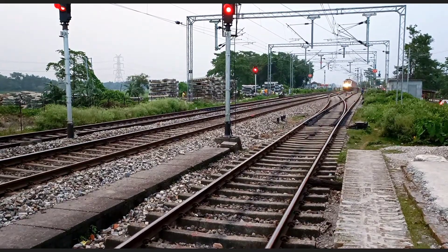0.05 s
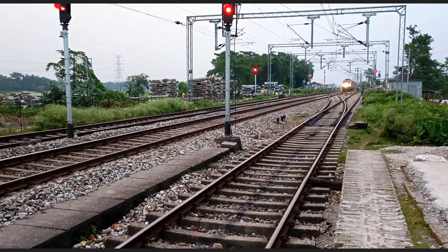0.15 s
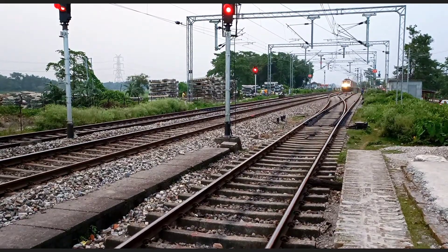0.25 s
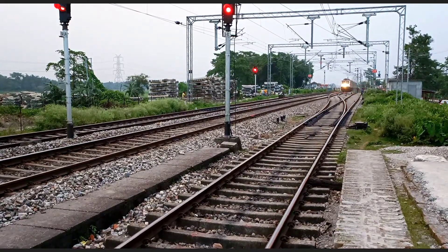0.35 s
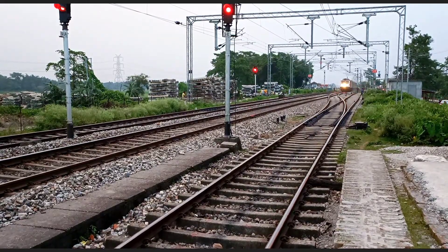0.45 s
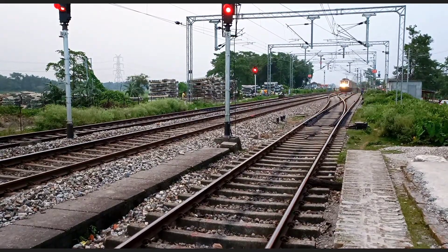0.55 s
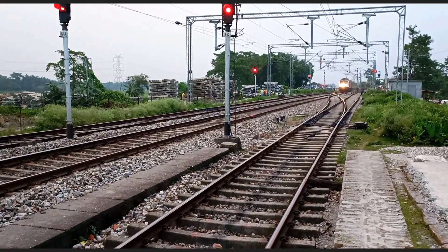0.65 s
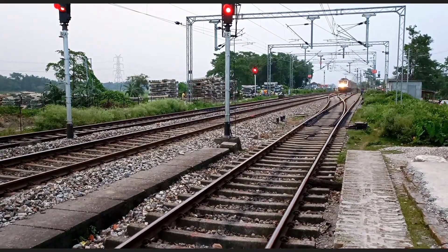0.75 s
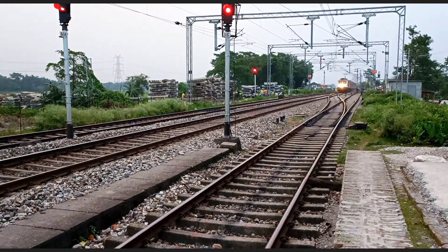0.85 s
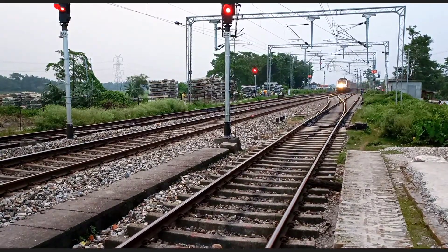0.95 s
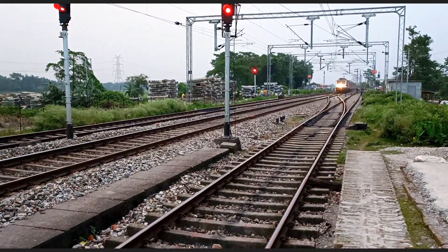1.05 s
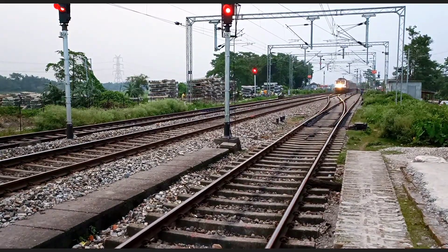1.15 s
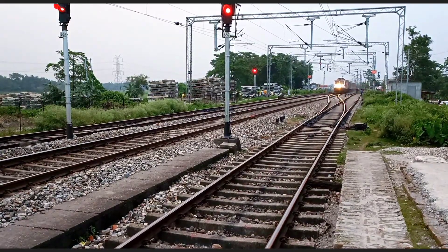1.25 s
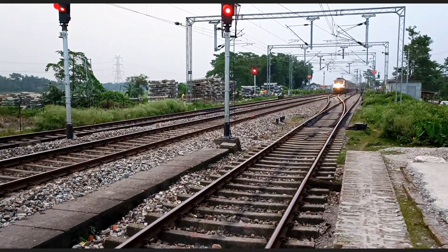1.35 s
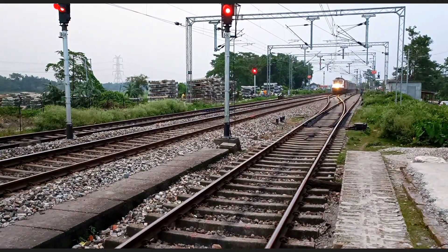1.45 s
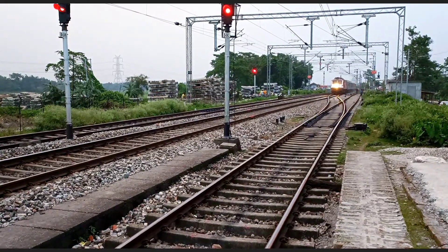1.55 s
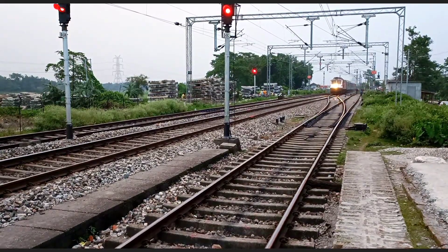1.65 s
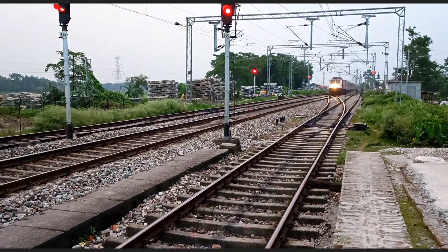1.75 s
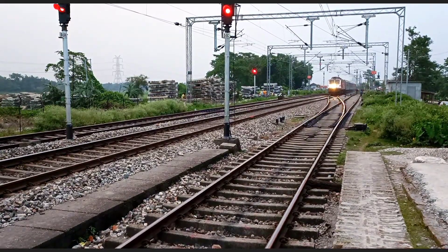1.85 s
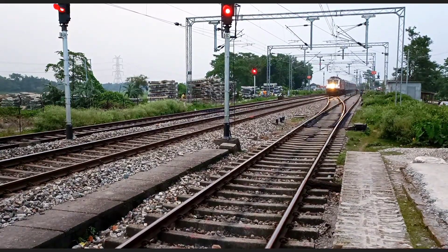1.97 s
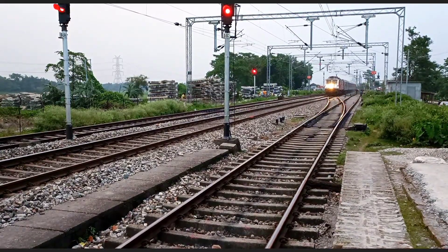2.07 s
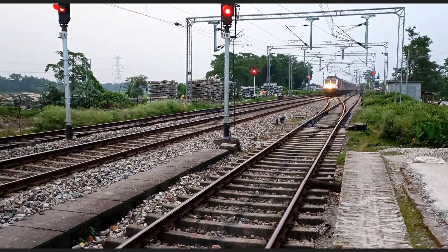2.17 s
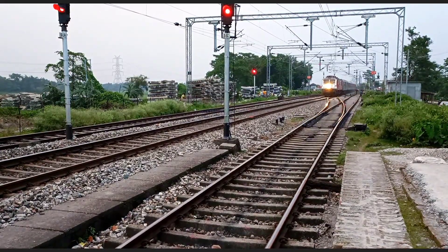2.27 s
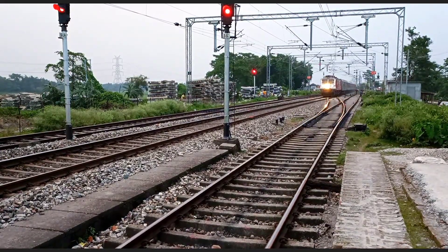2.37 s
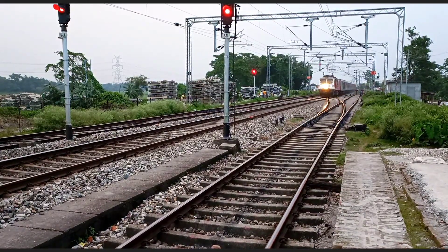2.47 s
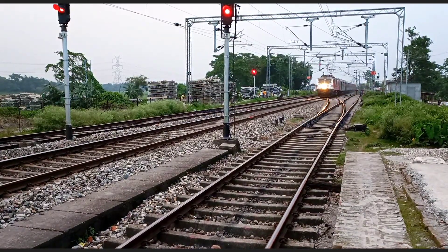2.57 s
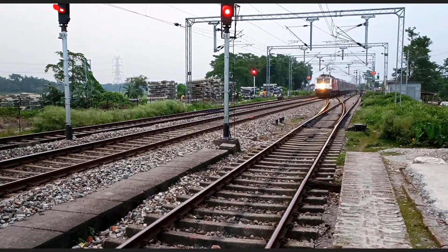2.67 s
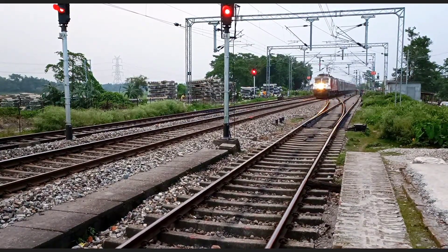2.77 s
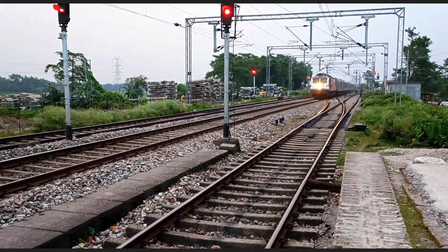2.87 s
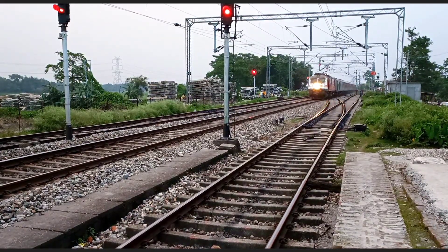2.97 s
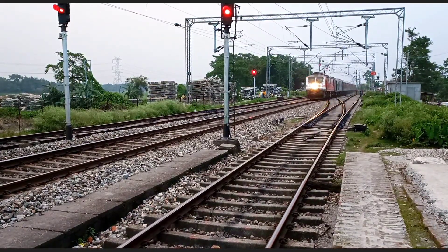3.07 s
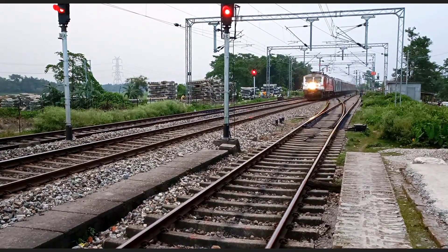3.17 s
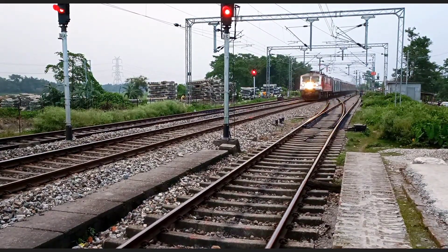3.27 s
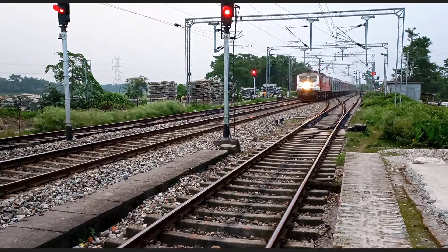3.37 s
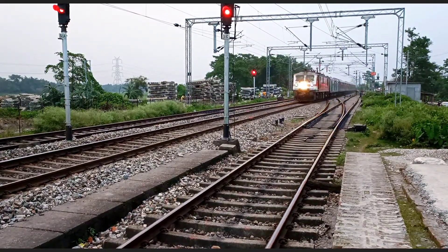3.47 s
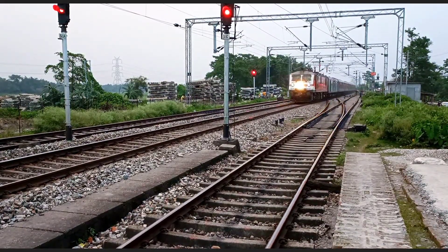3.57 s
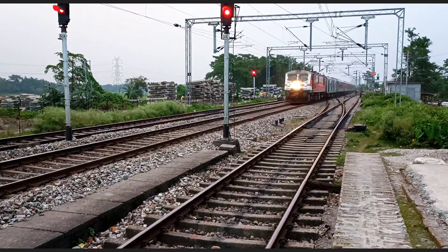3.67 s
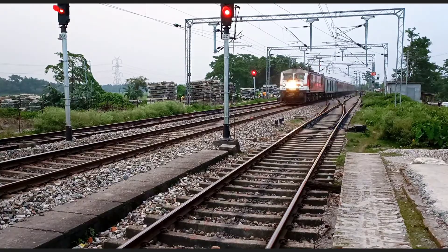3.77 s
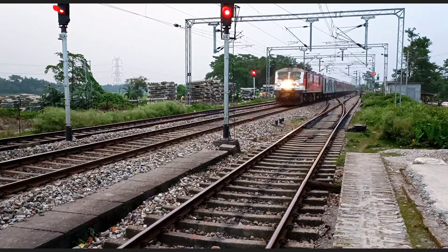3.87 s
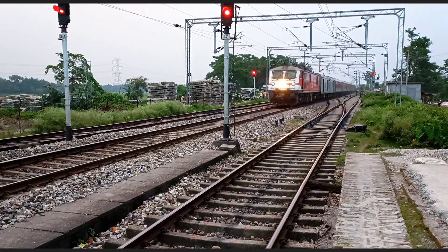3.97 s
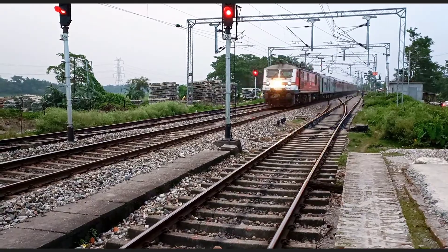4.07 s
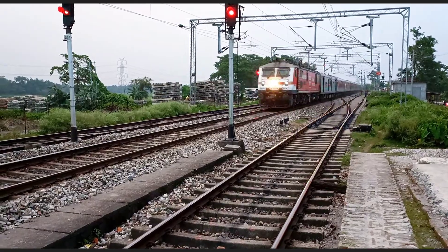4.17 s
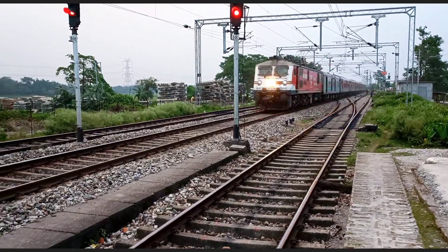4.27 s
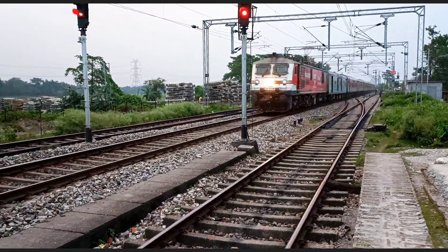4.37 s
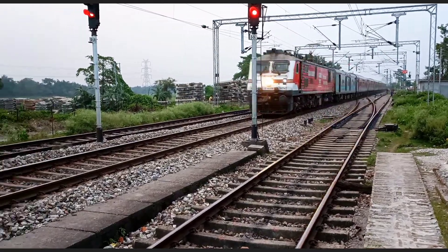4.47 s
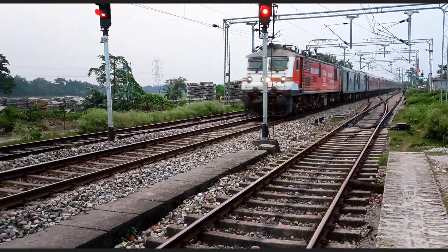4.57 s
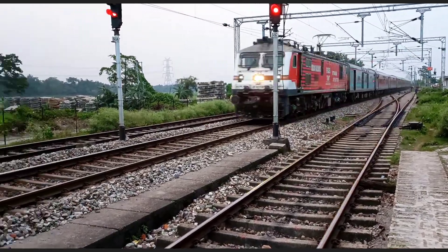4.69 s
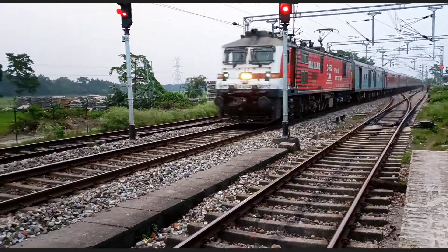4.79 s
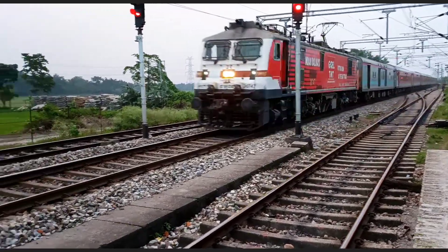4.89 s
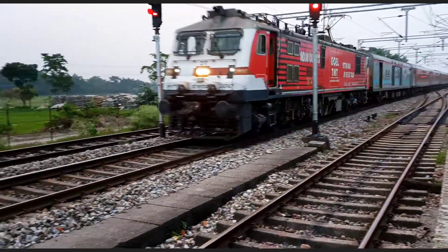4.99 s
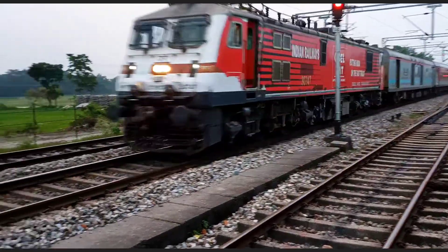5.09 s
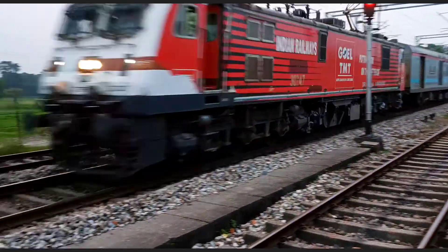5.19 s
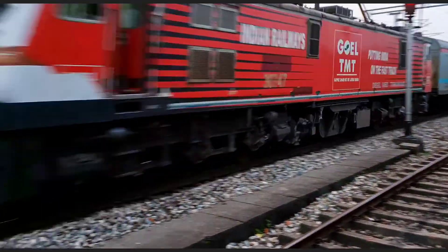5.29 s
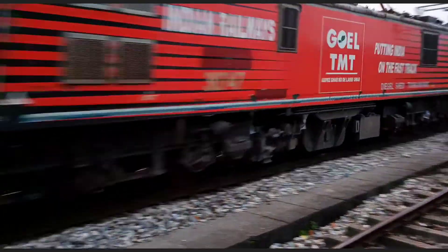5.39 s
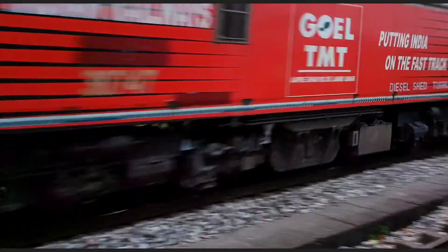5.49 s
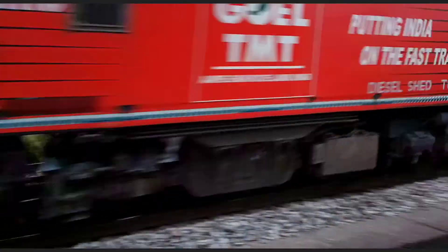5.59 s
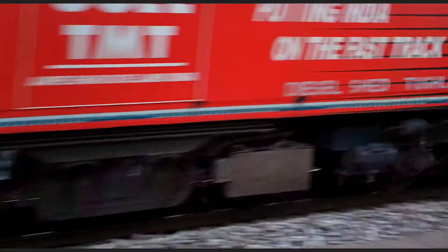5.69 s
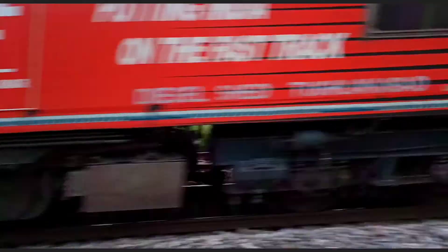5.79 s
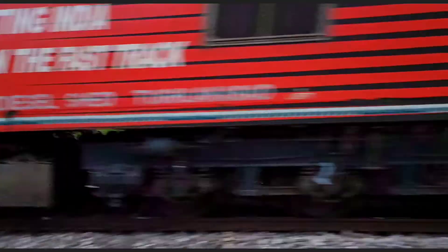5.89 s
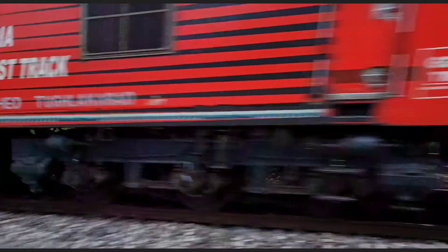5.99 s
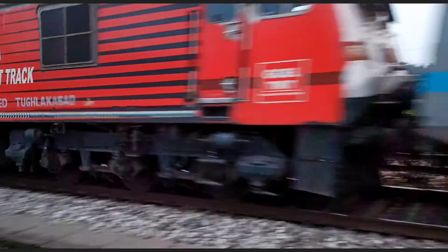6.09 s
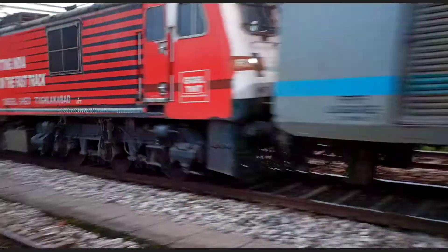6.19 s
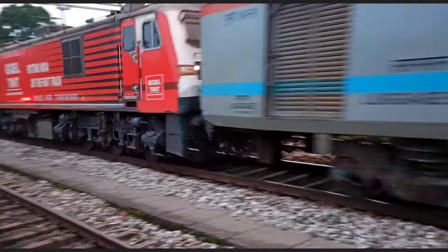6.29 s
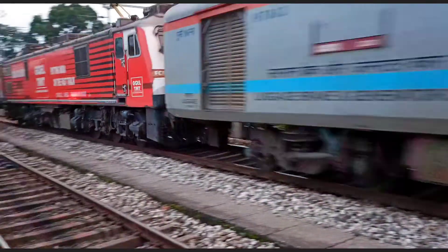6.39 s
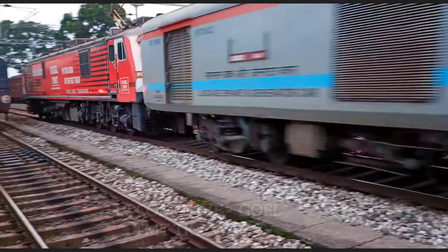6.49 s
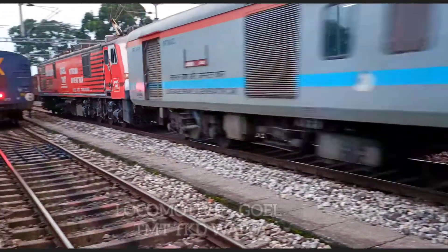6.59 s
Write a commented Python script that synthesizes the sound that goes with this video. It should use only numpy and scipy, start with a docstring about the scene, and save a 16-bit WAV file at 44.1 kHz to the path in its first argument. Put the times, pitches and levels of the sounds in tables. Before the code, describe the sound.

A locomotive air horn sounds over a distant rumble, then again louder as the train sweeps by, clattering, hissing and squealing.

```python
"""An air horn sounds over a distant rumble, then again, louder, as an electric locomotive nears and sweeps
past two microphones. Air shakes the horn's diaphragm, and the note drops as it passes. The lower note is
a faint echo while the train approaches, then loud and fluttering as the horn moves away. Rails rumble,
wheels roar and knock over joints and points, and their rims (flanges) hiss and squeal against the rail."""
import sys
import numpy as np
from scipy import signal
from scipy.io import wavfile
from scipy.ndimage import uniform_filter1d

SR = 44100
rng = np.random.default_rng(int(sys.argv[2]) if len(sys.argv) > 2 else 0)


def generate_wav(signal):
    """Clip the signal to [-1, 1] and save it as 16-bit WAV at the path in sys.argv[1]."""
    frames = np.transpose(np.atleast_2d(signal))
    scaled = np.clip(frames, -1, 1) * 32767
    pcm = np.round(scaled).astype(np.int16)
    wavfile.write(sys.argv[1], SR, pcm)


N = 292824
T = np.arange(N) / SR

SPEED_M_S, SOUND_M_S, PASS_S, TRACK_M = 29.1, 343, 5.6, 7.3  # the horn passes at PASS_S, TRACK_M away
HORN_HZ, FILL_S, FLAT_HZ = 681.3, .17, 52  # the note starts flat and climbs while air pressure builds
DROP_HZ, SAG_HZ_PER_S = 10, 95  # it drops and sags once the valve shuts
# A partial is a tone at a whole multiple of the note; partial 1 is the note itself.
# High partials: (multiple, level [dB] against partial 2 if below 7, otherwise against the treble level)
HIGH_PARTIALS = [(5, -15.5), (6, -23), (7, 2.5), (8, -9), (9, -15), (10, -5), (11, -5), (12, -14), (13, -7),
                 (14, -17), (16, -23)]
# Sound off the ground briefly cancels the direct note: (time [s], depth [dB], half length [s])
GROUND_DIPS = [(.43, -3, .04), (1.22, -3, .04), (2.125, -6, .04), (4.5, -3, .05), (4.8, -6.5, .11),
               (5.125, -8, .05), (5.54, -5, .07), (5.7, -10, .035)]
# Each blast's course, before dips and fades:
# (time [s], partial 1 [dB], left over right [dB], treble level [dB])
BLAST_LEVELS = [
    [(0, -22, 5.5, -56), (.3, -20.5, 7, -56), (.58, -23, 8, -57), (1.07, -19, 6, -58),
     (1.44, -20, 4.5, -58), (1.52, -17, 3.5, -57), (1.85, -17, 3, -55), (2.09, -17, 3, -47),
     (2.39, -13, 5, -47), (2.45, -26, 1.5, -49), (2.55, -27, -4, -49), (2.72, -46, .5, -49)],
    [(3.62, -30, 4, -52), (3.72, -10.5, 5, -52), (4.04, -7.5, 0, -47), (4.16, -12.5, 4, -43),
     (4.68, -8.5, 3, -42), (5.0, -7.5, 2.5, -49), (5.4, -12, 2, -58), (5.45, -20, 2, -58),
     (5.76, -15, -6, -60), (5.83, -30, -10, -60)],
]
# The two blasts: (valve opens [s], valve shuts [s], silent [s], base level of partial 2 [dB],
# of partial 3 [dB], of partial 4 [dB], extra for partials above 7 [dB])
HORN_BLASTS = [(-.5, 2.41, 2.72, -33.5, -32, -50, -1.5), (3.62, 5.79, 5.83, -34, -29, -41.5, -6)]


def horn_blast(blast, levels, scatter=.16, halo_db=-24):
    """Air shakes a diaphragm into a stack of partials; the higher ones twinkle more in moving air."""
    opens, shuts, end, db2, db3, db4, top_db = blast
    span = (T >= opens) & (T <= end)
    t = T[span]
    facing = ahead_m(t) / np.hypot(ahead_m(t), TRACK_M)  # 1 head-on, 0 alongside
    weak = np.clip(1 - (t - opens) / FILL_S, 0, 1)
    shut = np.clip((t - shuts) / .03, 0, 1)
    hz = HORN_HZ / (1 - facing * SPEED_M_S / SOUND_M_S)  # higher while it approaches
    hz = hz - FLAT_HZ * weak - shut * (DROP_HZ + SAG_HZ_PER_S * (t - shuts))
    # low pressure, a shut valve or being off to the side roughens the tone and thins the overtones
    aside = np.maximum(1 - facing - .11, 0)
    rough = np.clip(.08 + .35 * weak + .75 * shut + 4 * aside, 0, .9)
    thin_db = -30 * np.maximum(weak, shut) - 7 * (1 - facing)
    dip_db = sum(db * np.clip(1 - abs(t - s) / half_s, 0, 1) for s, db, half_s in GROUND_DIPS)
    times, *columns = np.transpose(levels)
    note_db, side_db, treble_db = (np.interp(t, times, column) for column in columns)
    pan_db = side_db - .6 * dip_db  # each dip leans left
    overtones = [(2, db2), (3, db3), (4, db4)]
    overtones += [(k, (db2 if k < 7 else treble_db) + db + top_db * (k > 7)) for k, db in HIGH_PARTIALS]
    partials = [(1, note_db + dip_db)] + [(k, db + thin_db) for k, db in overtones]
    phase, size = 2 * np.pi * np.cumsum(hz) / SR, len(t)
    sound = np.zeros((2, size))
    for k, db in partials:
        tone = amp(db) * np.exp(1j * k * phase)
        blur = min(scatter * (k - 1), .85)
        twinkle = (1 + blur * wander(18 + 3 * k, size)) / np.hypot(1, blur)
        rasp = wander(min(35 + 15 * k, 95), size)
        direct = tone * (np.sqrt(1 - rough ** 2) * twinkle + rough * rasp)
        sound += stereo(direct, hz, pan_db, lead_rad=.65) if k == 1 else stereo(direct, k * hz)
        # masts and track stones scatter a faint halo round each partial
        sound += amp(halo_db) * np.real([tone * wander(60, size), tone * wander(45, size)])
    out = np.zeros((2, N))
    out[:, span] = sound * np.minimum((end - t) / .052, 1) * np.minimum((t - opens) / .083, 1)
    return out


# The horn's lower, receding note: (time [s], level [dB])
RECEDING_LEVELS = [(0, -47), (.6, -43), (1.95, -40), (2.55, -43), (2.8, -55), (3.7, -52), (4.3, -39),
                   (5.9, -42), (6.15, -31), (6.36, -23), (6.48, -28), (6.56, -15), (6.6, -25), (6.64, -16)]
# Its overtones: (multiple, level against their shared level [dB])
RECEDING_OVERTONES = [(2, -4), (3, 0), (4, 3)]


def receding_horn():
    """The lower note: a faint echo as the train nears, then loud and fluttering as the horn moves away."""
    note_db = np.interp(T, *np.transpose(RECEDING_LEVELS))
    shared_db = np.minimum(note_db - 6.5, -34.5)
    hz = HORN_HZ / (1 + SPEED_M_S / SOUND_M_S)
    out = np.zeros((2, N))
    for k, db in [(1, note_db)] + [(k, shared_db + db) for k, db in RECEDING_OVERTONES]:
        tone = amp(db) * np.exp(2j * np.pi * k * hz * T)
        flutter = np.array([.8 + .5 * wander(6 * k, N), .6 + .4 * wander(6 * k, N)])
        out += np.sqrt(2) * np.real(tone * flutter)
    return out


# The horn's echo: (time to fade by 60 dB [s], level [dB])
HORN_ECHO = (.7, -13)


def echoes(horn):
    """Masts, sheds and trees throw the horn back as a fading wash, different in each ear."""
    fade_s, db = HORN_ECHO
    t = np.arange(SR // 2) / SR
    tail = rng.standard_normal((2, len(t))) * (t > .02) * amp(-60 * t / fade_s)
    return amp(db) * signal.fftconvolve(horn, tail / np.linalg.norm(tail[0]), axes=1)[:, :N]


# Five layers of rolling noise, a row each for rumble, roar, clatter, hiss and sizzle:
# (level alongside [dB], loss over ground and air [dB/m], background level [dB])
NOISE_LAYERS = [(-30, .045, -46), (-24.5, .16, -46), (-34, .02, -50), (-33, .11, -65), (-34, .22, -80)]
# Wheels cross joints and points: (start [s], end [s], rumble [dB], roar [dB], clatter [dB])
WHEEL_SURGES = [(.02, .15, -38, -52, -50), (1.36, 1.55, -34, -39, -39), (2.57, 2.75, -30, -35, -46),
                (2.84, 3.0, -38, -29, -44), (3.0, 3.25, -22.5, -23, -36), (3.41, 3.85, -25, -21, -38),
                (4.2, 4.6, -28, -30, -42), (4.6, 4.95, -30, -25, -40), (5.1, 5.4, -27, -20, -33),
                (5.43, 5.6, -40, -30, -29), (5.68, 5.78, -34, -16, -33), (5.76, 5.92, -32, -28, -19.5),
                (5.98, 6.33, -26, -21, -25.5), (6.4, 6.7, -36, -32, -32)]
# Flanges scrape the rail: (start [s], end [s], rise time [s], hiss [dB], sizzle [dB])
FLANGE_SCRAPES = [(1.35, 1.5, .03, -47, -57), (2.25, 2.38, .08, -50, -51), (2.53, 2.6, .06, -52, -46),
                  (2.6, 4.2, .2, -46, -45), (2.71, 2.81, .06, -42, -39), (2.94, 3.25, .15, -38, -42),
                  (3.42, 3.68, .1, -34, -30), (3.87, 4.08, .11, -45, -33), (4.57, 4.68, .05, -35, -35),
                  (4.68, 4.8, .06, -25, -21), (5.42, 5.62, .02, -19.5, -25), (5.76, 5.95, .015, -24, -19.5),
                  (5.96, 6.13, .04, -21.5, -24), (6.13, 6.38, .06, -26, -23), (6.4, 6.55, .04, -32, -36),
                  (6.55, 6.7, .06, -28, -25)]


def layer_levels(t, train_m=30, doubling_db=3):
    """Each layer's level in dB: steady rolling that grows as the train nears, plus surges and scrapes."""
    metres = np.hypot(np.maximum(ahead_m(t), 0), train_m)  # this much train is heard as one source
    db, loss_db, quiet_db = np.transpose(NOISE_LAYERS)[:, :, None]
    steady_db = db - doubling_db * np.log2(metres / train_m) - loss_db * (metres - train_m)
    surges = bursts(t, WHEEL_SURGES, rise_s=.025, fall_s=.16)
    rows = np.array(FLANGE_SCRAPES)
    scrapes = bursts(t, np.delete(rows, 2, axis=1), rise_s=rows[:, 2:3], fall_s=.08)
    return 10 * np.log10(amp(steady_db) ** 2 + amp(quiet_db) ** 2 + np.vstack([surges, scrapes]))


# Where the five layers lie: (low edge [Hz], high edge [Hz])
LAYER_BANDS = [(30, 130), (150, 600), (2350, 2900), (5400, 7300), (10500, 15700)]
# Tone colour of the rolling, far off and alongside: (frequency [Hz], relative level [dB])
FAR_COLOUR = [(15, -54), (30, -20), (48, 4), (95, 2), (140, -11.5), (250, -11.5), (449, -13), (637, -13),
              (1100, -20), (1680, -24.5), (2250, -21), (2800, -28.5), (7030, -36.5), (15800, -48)]
NEAR_COLOUR = [(15, -48), (25, -18), (66, -10), (174, 0.5), (299, 2.5), (834, -4), (1680, -13.5),
               (2390, -12.5), (4820, -16), (5670, -13.5), (15800, -28)]
# Ground and microphone housing dent and lift the far sound: (centre [Hz], width [Hz], change [dB])
FAR_DENTS = [(1720, 230, -9.5), (2630, 200, -5.5), (4670, 160, -0.5), (6700, 390, 1.5), (7920, 400, -1.5),
             (9500, 290, 0)]
# Alongside, the two microphones hear the rolling less alike and the dents fill in: (time [s], nearness [0-1])
TRAIN_NEARNESS = [(0, 0), (5.0, 0.01), (5.72, .15), (5.82, 0.96), (6.28, .95), (6.4, .35), (6.64, .35)]


def rolling(size, patchy_db, flicker_db):
    """Wheels on rails make a broad noise, built here in overlapping frames of `size` samples."""
    hop = size // 4
    frames, hz = N // hop + 5, np.fft.rfftfreq(size, 1 / SR)
    t = np.arange(frames) * hop / SR
    a, b, c, d, patches = rng.standard_normal((frames, len(hz), 5)).T
    patches = unit_level(uniform_filter1d(uniform_filter1d(patches, 6, axis=0), 2304 // hop, axis=1))
    treble = np.clip(hz / 6000, 0, 1)[:, None]
    flicker = treble * unit_level(uniform_filter1d(rng.standard_normal(frames), 3))
    near = np.interp(t, *np.transpose(TRAIN_NEARNESS)).clip(0, 1)
    dents = sum(db * np.exp(-((hz - centre) / width) ** 2) for centre, width, db in FAR_DENTS)
    colour = np.outer(look_up(FAR_COLOUR, hz) + dents, 1 - near) + np.outer(look_up(NEAR_COLOUR, hz), near)
    # bend the colour so that each band follows its layer's level
    lift = [db - 10 * np.log10((amp(colour[(hz > low) & (hz < high)]) ** 2).sum(0))
            for db, (low, high) in zip(layer_levels(t), LAYER_BANDS)]
    centres = np.log(np.prod(LAYER_BANDS, axis=1)) / 2
    blend = np.array([np.interp(np.log(hz + 1), centres, row) for row in np.eye(len(centres))])
    crossover = np.clip((hz - 200) / 200, 0, 1) * np.pi / 2
    share = np.cos(crossover) if size > 1000 else np.sin(crossover)  # long frames carry the bass
    gain = share[:, None] * amp(colour + blend.T @ lift + patchy_db * patches + flicker_db * flicker)
    alike = np.clip(np.outer(look_up(MIC_PAIR, hz), 1 - .95 * near), 0, 1)
    left = a + 1j * b
    right = alike * left + np.sqrt(1 - alike ** 2) * (c + 1j * d)
    right *= np.exp(2j * np.pi * hz * LEFT_LAG_S)[:, None]
    tilt = left_gain(hz)[:, None]
    spectra = np.array([left * tilt, right / tilt]) * gain
    return signal.istft(spectra, nperseg=size, noverlap=size - hop)[1][:, :N]


# How wheel and rail ring: (pitch [Hz], relative level [dB], time to fade by 60 dB [s])
WHEEL_RINGS = [(95, 5, 0.19), (260, -1, 0.12), (430, 5.5, 0.11), (570, -8, 0.29), (980, -0.5, .1),
               (2270, 5, 0.055), (3270, -8, .04)]
# Wheels hit joints: (time [s], peak of the ring [dB], favoured pitch [Hz], rattle [dB])
JOINT_KNOCKS = [(1.355, -27, 900, -33), (1.415, -29, 260, -36), (1.49, -26, 900, -36),
                (1.56, -30, 570, -40), (2.572, -27, 260, -42), (3.016, -13, 430, -31),
                (3.148, -18, 95, -32), (3.265, -11, 570, -36), (3.422, -10.5, 570, -33),
                (3.52, -12, 430, -35), (4.617, -10, 430, -36), (4.72, -10, 430, -36), (5.209, -8, 980, -36),
                (5.266, -12, 980, -36), (5.339, -9, 980, -34), (5.962, -22, 260, -30),
                (6.438, -16, 260, -34)]


def knocks(rattle_s=.35):
    """Each blow is a short rough burst that rings wheel and rail and shakes loose fittings."""
    out, t = np.zeros((2, N + SR)), np.arange(8000) / SR
    band = signal.butter(2, [450, 4500], "bandpass", fs=SR)
    for s, db, main_hz, rattle_db in JOINT_KNOCKS:
        ring = 0
        for hz, ring_db, fade_s in WHEEL_RINGS:
            level = amp(ring_db - 13 * abs(np.log2(hz / main_hz)) - 60 * t / fade_s)
            ring += level * np.sin(2 * np.pi * hz * rng.uniform(.95, 1.04) * t)
        blow = (1 + rng.standard_normal(200)) * np.exp(-np.arange(200) / 12)
        hit = signal.fftconvolve(ring, blow)[:len(t)]
        common, left, right = signal.lfilter(*band, rng.standard_normal((3, len(t))))
        rattle = unit_level(np.array([common + left, common + right]))
        rattle *= amp(rattle_db - 60 * t / rattle_s) * np.minimum(t / .004, 1)
        out[:, round(s * SR):][:, :len(t)] += amp(db) * hit / abs(hit).max() + rattle
    return np.array([np.roll(out[0], round(LEFT_LAG_S * SR))[:N], out[1, :N]])


# Small random squeaks: (start [s], end [s], rate [1/s], rough pitch [Hz], lowest level [dB])
SMALL_SQUEAKS = (3.35, 4.45, 8, 7000, -45)
# Flanges squeal: (start [s], end [s], first pitch [Hz], last pitch [Hz], width [Hz], level [dB])
FLANGE_SQUEALS = [(3.493, 3.556, 7100, 6750, 500, -29), (4.211, 4.395, 10000, 10100, 500, -37),
                  (4.293, 4.36, 7200, 7100, 600, -35), (3.92, 4.297, 13500, 13170, 3000, -32.5),
                  (4.592, 4.68, 6700, 6500, 900, -28), (4.708, 4.865, 6860, 6700, 900, -25),
                  (4.699, 4.9, 12300, 12250, 250, -29), (5.0, 5.2, 10200, 10100, 120, -43),
                  (5.43, 5.696, 6300, 6110, 350, -22.5), (5.46, 5.67, 6300, 6020, 70, -16.5),
                  (6.197, 6.356, 13800, 13100, 250, -32.5), (6.23, 6.34, 15300, 15000, 300, -30),
                  (6.15, 6.42, 14600, 14000, 2500, -27), (6.23, 6.34, 14800, 14350, 200, -33),
                  (6.36, 6.423, 13500, 13700, 80, -27)]


def squeals():
    """A slipping flange sings an unsteady, mostly falling note that bites quickly and dies slowly."""
    start, end, per_s, hz, db = SMALL_SQUEAKS
    squeaks = []
    for when, length, pitch, loudness in rng.random((round((end - start) * per_s), 4)):
        s = start + (end - start) * when
        glide_hz = hz * (.93 + .14 * pitch), hz * (.92 + .128 * pitch)
        squeaks.append((s, s + .027 + .071 * length, *glide_hz, 500, db + 9 * loudness))
    out = np.zeros((2, N))
    for start, end, from_hz, to_hz, width_hz, db in FLANGE_SQUEALS + squeaks:
        span = (T >= start) & (T < end)
        size = span.sum()
        hz, progress = np.linspace(from_hz, to_hz, size), np.linspace(0, 1, size)
        swell = np.minimum(progress / .13, 1) * np.minimum((1 - progress) / .5, 1)
        tone = amp(db) * swell * np.exp(2j * np.pi * np.cumsum(hz) / SR)
        left = tone * left_gain(hz) * wander(width_hz, size)
        right = tone / left_gain(hz) * wander(width_hz, size)
        out[:, span] += np.sqrt(2) * np.real([left, right])
    return out


LEFT_LAG_S = .000091  # the left microphone hears later
# The two microphones: (frequency [Hz], how alike they sound [0-1], left over right [dB])
MIC_PAIR = [(60, .9, 0), (200, .9, -.5), (450, 0.95, -2.5), (810, 0.65, 1), (2000, 0.44, -1),
            (3500, 0.75, 0), (6140, 0.2, -7), (7800, 0.14, 2.5), (9500, 0.13, 6.5), (11100, .1, 1.5),
            (13500, .1, -9), (15700, .1, -10)]


def left_gain(hz):
    """The left microphone's gain at this pitch; the right one gets the inverse."""
    return amp(look_up(MIC_PAIR, hz, column=2) / 2)


def stereo(tone, hz, pan_db=None, lead_rad=None):
    """A tone as the two microphones hear it: unequal in level, the right one slightly ahead."""
    gain = left_gain(hz) if pan_db is None else amp(pan_db / 2)
    lead_rad = 2 * np.pi * hz * LEFT_LAG_S if lead_rad is None else lead_rad
    left = gain * np.exp(-.5j * lead_rad)
    pair = np.array([left, 1 / left])
    return np.sqrt(2) * np.real(tone * pair / np.maximum(abs(pair.mean(0)), .4))


def ahead_m(t):
    """Metres of track left before the horn passes the microphones."""
    return SPEED_M_S * (PASS_S - t)


def bursts(t, rows, rise_s, fall_s):
    """Power over time for each level column: every row rises, holds and dies away."""
    rows = np.array(rows)
    rise = np.clip((t - rows[:, :1]) / rise_s, 0, 1)
    fall = np.exp(-np.maximum(t - rows[:, 1:2], 0) / fall_s)
    return amp(rows[:, 2:].T) ** 2 @ (rise * fall) ** 2


def wander(width_hz, size):
    """A random wobble of level and phase; the wider it is, the faster it moves."""
    step = 32 if width_hz < 100 else 1
    pole = [1, -np.exp(-np.pi * width_hz * step / SR)]
    a, b = rng.standard_normal((size // step + 402, 2)).T
    wobble = unit_level(signal.lfilter([1], np.convolve(pole, pole), a + 1j * b)[400:])
    return np.interp(np.arange(size) / step, np.arange(len(wobble)), wobble)


def look_up(points, hz, column=1):
    """A table's value at any frequency, sliding between its rows."""
    table = np.transpose(points)
    return np.interp(np.log(hz + 1), np.log(table[0] + 1), table[column])


def unit_level(x):
    """Scale to an average power of 1."""
    return x / np.sqrt(np.mean(abs(x) ** 2) + 1e-20)


def amp(db):
    """Turn decibels into a gain."""
    return 10 ** (np.asarray(db) / 20)


def scene():
    """The horn, its echoes and its receding note over the noise of wheels and rails."""
    horn = sum(horn_blast(blast, levels) for blast, levels in zip(HORN_BLASTS, BLAST_LEVELS))
    rails = rolling(size=4096, patchy_db=3, flicker_db=-3)
    rails += rolling(size=512, patchy_db=1.5, flicker_db=1.03)
    return horn + echoes(horn) + receding_horn() + rails + squeals() + knocks()


def record(dry):
    """A brief fade-in; overload rounds off the highest peaks; the very top of the treble is cut."""
    fade_in_s, top_hz = .008, 15850
    soft = np.minimum(T / fade_in_s, 1) * dry / (1 + abs(dry) ** 6) ** (1 / 6)
    lowpass = signal.firwin(511, top_hz, window=("kaiser", 9), fs=SR)
    return signal.oaconvolve(soft, lowpass[None], "same")


dry = scene()
out = record(dry)
generate_wav(out)
```